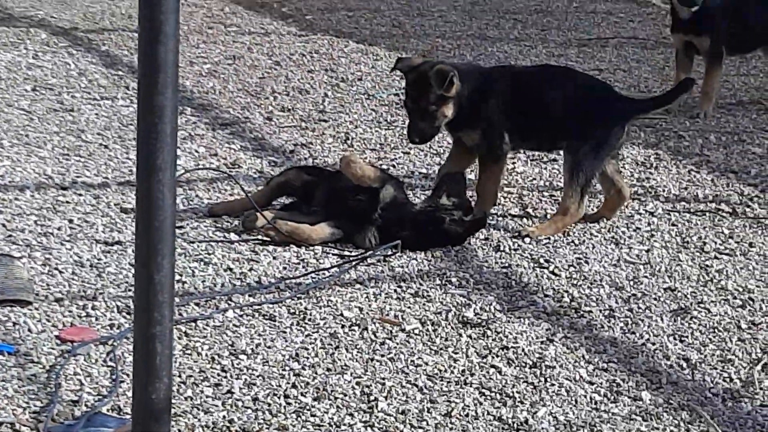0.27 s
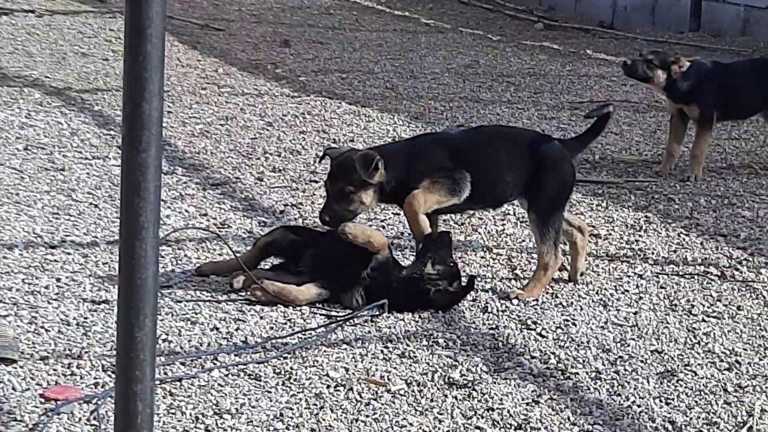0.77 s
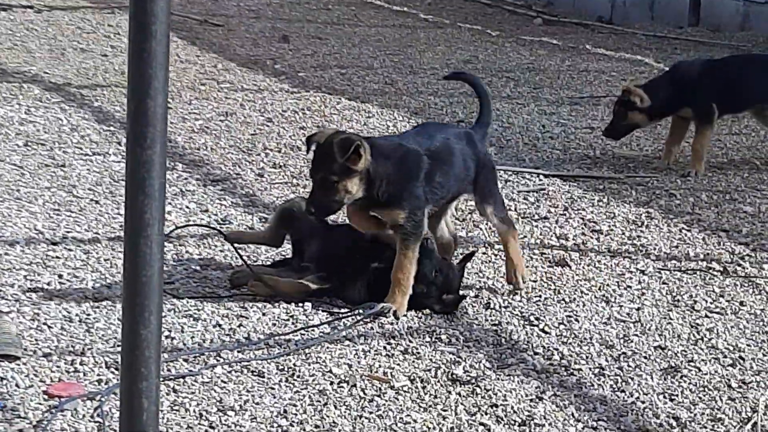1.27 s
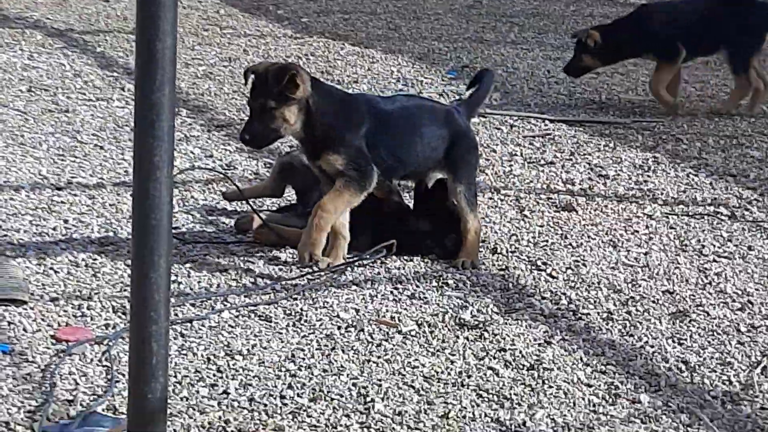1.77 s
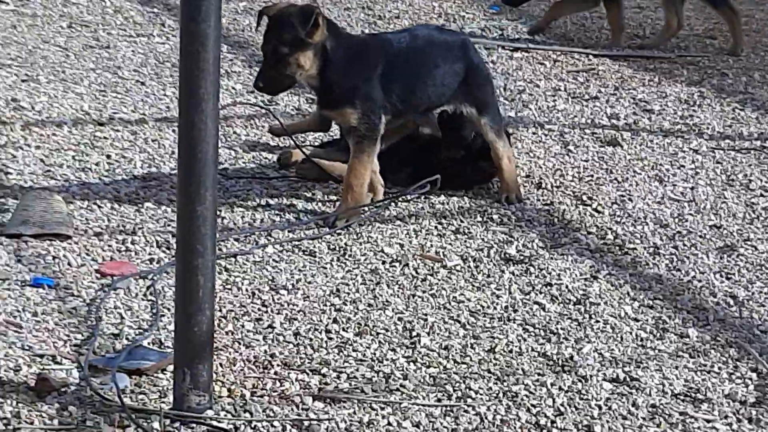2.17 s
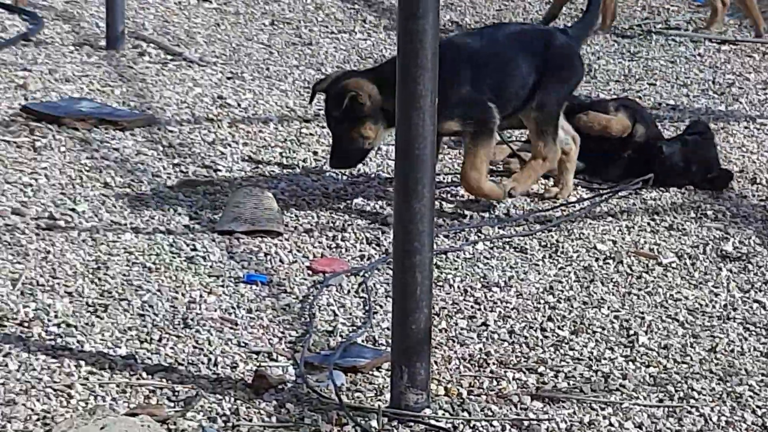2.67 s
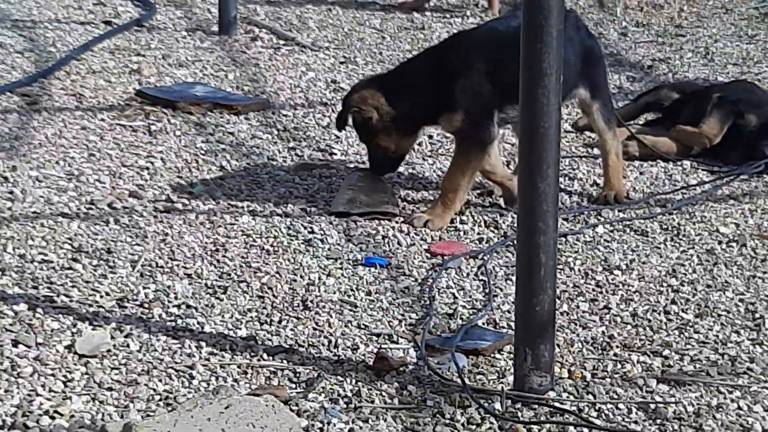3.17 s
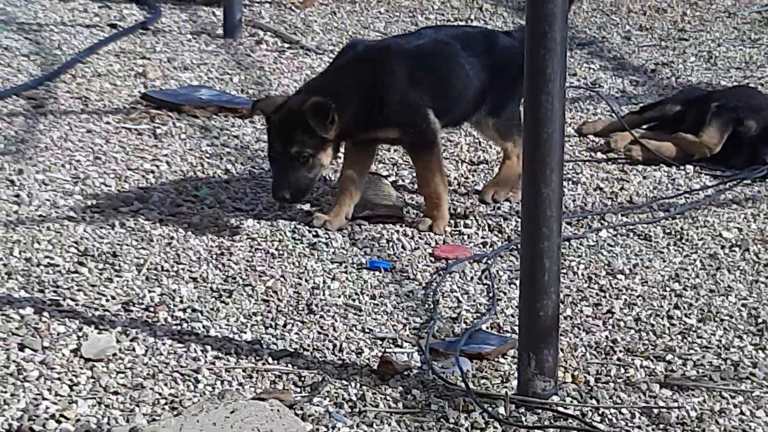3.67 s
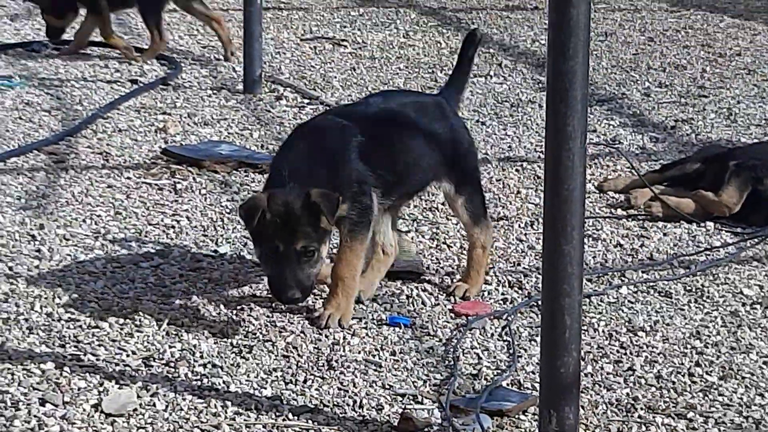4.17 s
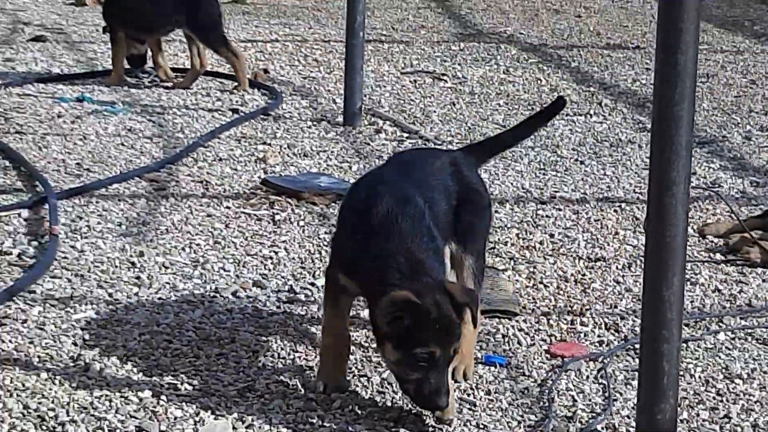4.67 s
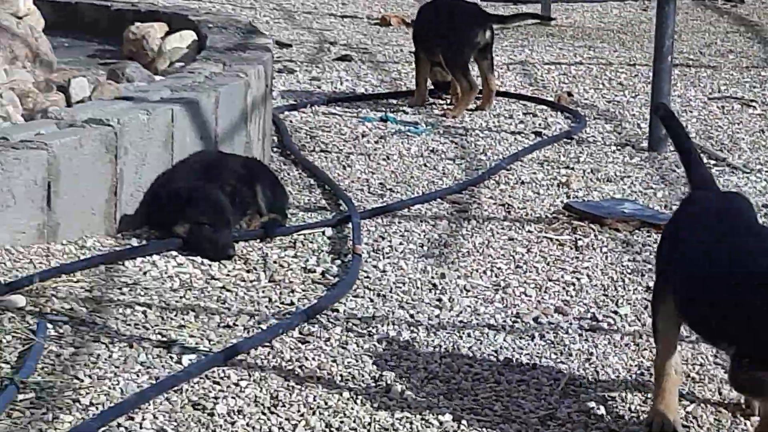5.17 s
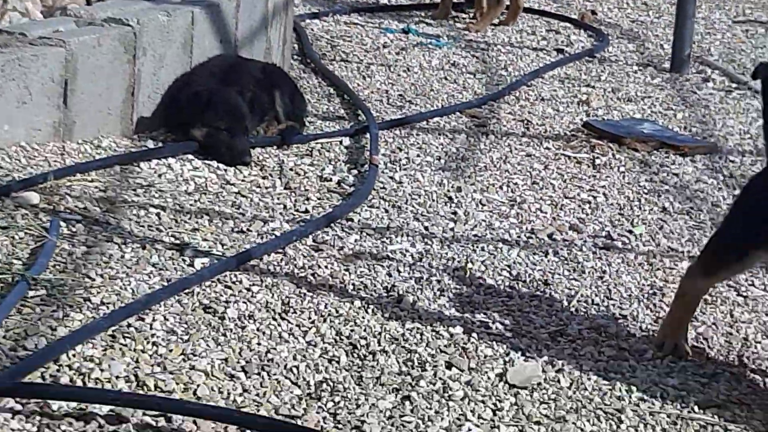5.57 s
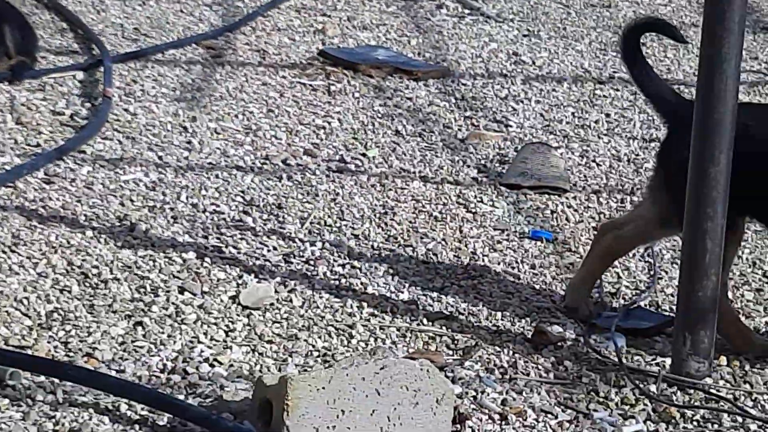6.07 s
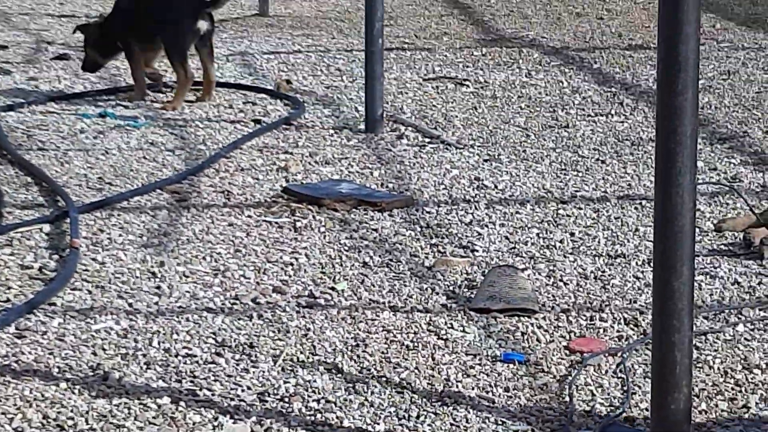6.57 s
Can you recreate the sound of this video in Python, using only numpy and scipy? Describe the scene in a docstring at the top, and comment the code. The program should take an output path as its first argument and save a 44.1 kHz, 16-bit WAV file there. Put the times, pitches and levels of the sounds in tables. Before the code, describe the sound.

Puppies scuffle in a gravel yard, a few metres from a handheld stereo microphone. Their paws softly grind grit, scrape stones and click pebbles together over a faint outdoor hiss. Gusts of wind rumble and thump on the microphone, loudest in the first half. Past the middle one puppy gives a short, low, rough growl, then a few more pebble clicks and light puffs of wind follow.

```python
"""An airy outdoor hiss and shifting gravel come first: puppies scuffle in a yard, a few metres from a
handheld stereo recorder. Their paws grind grit, scrape stones and knock pebbles together, while a gusty
breeze rumbles and thumps on the two microphone ports separately. Past the middle one puppy gives a short
low growl, its unsteady vocal folds breaking between two pitches through throat and mouth."""
import sys
import numpy as np
from scipy import signal
from scipy.fft import rfft, irfft, next_fast_len
from scipy.io import wavfile
from scipy.ndimage import uniform_filter1d

SR = 44100
rng = np.random.default_rng(int(sys.argv[2]) if len(sys.argv) > 2 else 0)


def pcm_store(signal):
    """Save signal as 16-bit PCM."""
    levels = np.round(np.clip(np.atleast_2d(signal), -1, 1) * 32767)
    wavfile.write(sys.argv[1], SR, levels.astype(np.int16).T)


N = 300762
LAG_MS = .36  # most sound reaches the left port first


def undb(db):
    """dB to gain."""
    return 10 ** (np.asarray(db) / 20)


def unit(x):
    """Scale to rms 1."""
    return x / np.sqrt(np.mean(x ** 2))


def curves(table):
    """Columns of a timed table, interpolated sample by sample."""
    times, *columns = np.transpose(table)
    return [np.interp(np.arange(N) / SR, times, column) for column in columns]


def hump(f, hz, width):
    """Gain of a resonance centred on hz."""
    return 1 / (1 + ((f - hz) / (width / 2)) ** 2)


def colour(x, gain):
    """Weight the spectrum of x by gain(Hz)."""
    size = next_fast_len(x.shape[-1])
    f = np.arange(size // 2 + 1) * SR / size + 1
    return irfft(rfft(x, size) * gain(f), size)[..., :x.shape[-1]]


def spectrum(points):
    """Gain function through (f/Hz, level/dB) points."""
    hz, db = np.transpose(points)
    return lambda f: undb(np.interp(np.log(f), np.log(hz), db))


def walk(per_s):
    """Random levels held 1 / per_s seconds and smoothed twice; spread near 1."""
    hold = int(SR / per_s)
    steps = np.repeat(rng.standard_normal(N // hold + 1), hold)
    return 1.51 * uniform_filter1d(uniform_filter1d(steps, hold), hold)[:N]


def add(out, s, x):
    """Mix x in from time s, dropping what falls outside the scene."""
    start = int(s * SR)
    x, start = x[max(-start, 0):], max(start, 0)
    out[start:start + len(x)] += x[:N - start]


def grit(n, per_s, spread_db, bed):
    """Dense one-sample grains of uneven size over a bed of noise."""
    chance, size = rng.random((2, n))
    grains = (chance < per_s / SR) * undb(-spread_db * np.log(size + 1e-9)) * rng.standard_normal(n)
    return unit(grains) + bed * rng.standard_normal(n)


def ports(x, pan_db=0., lag_ms=LAG_MS):
    """One source at both microphone ports, later on the right."""
    lag = np.round(lag_ms * SR / 1000).astype(int)
    late = x[np.maximum(np.arange(N) - lag, 0)]
    return np.array([x * undb(pan_db / 2), late * undb(-pan_db / 2)])


def scattered(make, gain, shared_hz=2310):
    """Sound from all round the microphones: mostly shared in the bass, less so towards the treble."""
    share = lambda f: .17 + .48 * hump(f, 0, 2 * shared_hz)
    common = ports(colour(make(), lambda f: gain(f) * np.sqrt(share(f))))
    separate = colour(np.array([make(), make()]), lambda f: gain(f) * np.sqrt(1 - share(f)))
    return unit(common + separate)


def yard(x, pan_db, lag_ms, scatter_db, t60_s=.05):
    """Direct sound plus the short scatter off ground and walls, which differs at each port."""
    t = np.arange(int(.15 * SR)) / SR
    tails = rng.standard_normal((2, len(t))) * np.exp(-np.log(1000) * t / t60_s) * (t > .001)
    tails = undb(scatter_db) * tails / np.linalg.norm(tails, axis=1, keepdims=True)
    return ports(x, pan_db, lag_ms) + signal.fftconvolve(x[None], tails, axes=1)[:, :N]


# Open air, far off, all round the microphones: f/Hz, relative density/dB
AIR_SPECTRUM = [(35, -56), (60, -9), (100, -8), (206, -9.5), (377, -5.5), (630, -13), (741, -29),
                (1180, -12), (1790, -10.5), (2260, -23.5), (2860, -25.5), (3700, -15.5), (5200, -23.5),
                (7080, -17.5), (9370, -17.5), (12700, -25.5), (15600, -25.5)]
# Its slow swell: t/s, level change/dB
HISS_SWELL = [(0, 5.5), (.3, -1.5), (1.4, -2.5), (2.2, 4.5), (5.3, 1), (6.82, -2)]


def air(level_db=-65):
    """Far hiss that swells slowly."""
    hiss = scattered(lambda: rng.standard_normal(N), spectrum(AIR_SPECTRUM))
    return undb(level_db + curves(HISS_SWELL)[0]) * hiss


# Gravel under paws, a few metres off: t/s, grit level/dB, then relative to it fine/dB, coarse/dB, rumble/dB
GRAVEL_SHIFTS = [(0.0, -63.5, -3, -0.5, -5), (0.32, -74.5, -3, -10.5, 0.5), (0.51, -65.5, -2, -7, -7),
                 (0.89, -76, -10, 0, 6.5), (1.37, -74, -9, 0.5, -2), (1.5, -64, 3.5, -17, -14),
                 (1.58, -59, 2, -19, -17), (1.65, -59, 1.5, -16.5, -17), (1.84, -66.5, -2, 1, 3),
                 (2.1, -64, -1, -1.5, -1), (2.36, -64.5, 4, 0, -3), (2.5, -66, -1.5, 0.5, -4.5),
                 (2.75, -66, -2, -6, -5), (3.1, -62, -1, -1, -4), (3.2, -67, -4.5, 3, 2.5),
                 (4.24, -64, -1, -5.5, -7.5), (4.62, -69, -1.5, -5.5, -5.5), (4.84, -60, -3, 2.5, 0.5),
                 (5.24, -64, -1, -3, -6), (5.6, -73.5, -5, -0.5, -3.5), (5.79, -63.5, -1, -4, -8),
                 (6.11, -69.5, -0.5, -12, -13), (6.17, -63, -4, -7, -17), (6.59, -69, 1, -2, -1),
                 (6.71, -61, -4, -5, -17), (6.82, -74.5, -2, 2.5, -9)]


def gravel():
    """Grit and stones grinding in four size ranges that flicker partly together."""
    db, fine_db, coarse_db, rumble_db = curves(GRAVEL_SHIFTS)
    flicker_db = 1.1 * walk(9) + 1.2 * walk(20)
    grains = lambda: grit(N, per_s=1500, spread_db=2.03, bed=.98)
    sizes = (0, 6500, 5500), (fine_db, 13300, 9000), (coarse_db, 1850, 2200), (rumble_db, 850, 700)
    out = 0
    for size_db, hz, width in sizes:
        band = scattered(grains, lambda f: hump(f, hz, width) ** 2)
        out = out + band * undb(db + size_db + flicker_db + .26 * walk(21.6))
    return out


# Turbulence right at the ports, one list for slow eddies and one for fast: f/Hz, relative density/dB
EDDY_SPECTRA = [
    [(20, -7.5), (65, 11.5), (125, 4.5), (200, -32), (400, -61), (900, -85)],
    [(40, -20), (125, 4.5), (190, -6.5), (300, -7.5), (500, -17), (700, -42.5), (1500, -57.5)],
]
# Breeze on the recorder: t/s, length/s, strength/dB, change to the end/dB, left minus right/dB
PORT_GUSTS = [(0.0, 0.027, -57, 9, 0), (0.539, 0.24, -48.5, -0.5, -0.5), (1.17, 0.1, -54.5, -4, 7),
              (1.533, 0.22, -41, -2.5, 1.5), (1.72, 0.028, -27.5, -6, 1), (1.768, .27, -40.5, -3, -2),
              (2.092, 0.39, -47, 2, 1), (2.727, 0.087, -58, 5, 18), (2.911, 0.35, -44.5, 4.5, 3),
              (3.105, 0.11, -34.5, -5.5, 0), (3.296, 0.16, -47, -3, 1.5), (3.454, 0.23, -43.5, -13, -2),
              (3.746, 1, -76, 6, -1), (4.74, .1, -63, -4.5, -3), (5.03, 0.17, -54, 5, 2),
              (5.394, 0.25, -58.5, 6.5, -0.5), (5.652, 0.19, -51, 2, 0.5), (5.967, 0.56, -72, 1.5, 19),
              (6.611, 0.09, -58, 4, 4.5), (6.738, 0.071, -49, -8, 5.5)]


def gusts(calm_db=-78, rise_db_s=903, fall_db_s=213, shared=.18):
    """Lumpy low turbulence, mostly unrelated at the two ports."""
    t, out = np.arange(N) / SR, np.zeros((2, N))
    veer_db = 3 * walk(14)  # the gust swings from port to port
    common = rng.standard_normal((2, N)) * np.sqrt(shared / (1 - shared))
    for side, port in zip((1, -1), out):
        eddies = []
        for points, common_noise in zip(EDDY_SPECTRA, common):
            rumble = colour(rng.standard_normal(N) + common_noise, spectrum(points))
            eddies.append(unit(rumble * undb(3.57 * walk(45) + 2.5 * walk(18))))
        slow, fast = eddies
        gust_db = calm_db
        for s, length, db, change_db, pan_db in PORT_GUSTS:
            held_db = db + side * pan_db / 2 + change_db * np.clip((t - s) / length, 0, 1)
            edge_db = rise_db_s * np.maximum(s - t, 0) + fall_db_s * np.maximum(t - s - length, 0)
            gust_db = np.maximum(gust_db, held_db - edge_db)
        gust_db += side * veer_db / 2
        # stronger gusts break into faster eddies
        turbulence = slow * undb(-.12 * (gust_db + 55.5)) + fast * undb(.56 * (gust_db + 37.5))
        port += undb(gust_db) * turbulence
    return out


# Paws dragging on the ground, a few metres off: t/s, level/dB, f/Hz, width/Hz, length/ms
PAW_SCRAPES = [(.04, -56, 740, 254, 160), (2.235, -45.5, 940, 870, 60), (2.263, -41, 1350, 428, 19),
               (2.35, -57, 5000, 9050, 195), (2.45, -55.5, 830, 150, 108), (2.796, -48.5, 4730, 9100, 12),
               (2.819, -44, 5800, 9000, 7.5), (2.815, -54.5, 1830, 2600, 47), (2.858, -47, 780, 674, 59),
               (2.909, -47, 820, 696, 13), (3.07, -46.5, 940, 695, 36), (3.085, -52.5, 3500, 7000, 30),
               (4.311, -62, 2390, 2110, 59), (6.45, -68, 860, 300, 210)]


def scrapes():
    """Each scrape is a burst of grains that swells and fades."""
    out, t = np.zeros(N), np.arange(-.15, .15, 1 / SR)
    for s, db, hz, width, ms in PAW_SCRAPES:
        grains = grit(len(t), per_s=2000, spread_db=1.27, bed=1)
        burst = unit(colour(grains, lambda f: hump(f, hz, width) * f / (f + 400)))
        swell = np.exp(-(t / (.00063 * ms)) ** 2)
        add(out, s + t[0], undb(db) * burst * swell)
    return out


# Pebbles struck on the same ground: t/s, crack peak/dB, f/Hz, width over f, snap drive/dB
PEBBLE_KNOCKS = [(0.228, -50, 5850, 0.36, -22), (0.47, -55, 5620, 0.38, -26), (0.568, -59, 11000, .8, -5.5),
                 (1.208, -50, 1740, 1, -27), (1.264, -55, 690, 0.74, -21), (1.83, -36, 1180, 0.44, -38),
                 (1.883, -41, 736, 1, -25), (2.119, -45, 3800, 0.52, -15), (2.127, -41, 3860, 0.29, -29),
                 (2.157, -39.5, 1140, 0.57, -32), (2.186, -53, 826, .9, -13), (2.221, -55, 3960, 0.82, -18),
                 (2.326, -47, 2080, 1, -7.5), (2.399, -39, 845, 0.12, -31), (2.994, -54, 1750, .9, -9),
                 (4.003, -51.5, 748, 0.68, -11), (4.108, -48.5, 3080, 0.17, -32), (4.17, -45, 2340, 1, -17),
                 (4.346, -40, 1320, 0.5, -24), (5.595, -49, 1150, 0.38, -15.5),
                 (5.619, -40, 1390, 0.21, -31), (5.679, -52.5, 2310, .8, -18),
                 (5.965, -54, 6390, 0.45, -20), (6.142, -42, 3730, 0.53, -10.5),
                 (6.143, -44.5, 1830, .9, -24), (6.168, -47, 4400, .8, -24), (6.312, -43, 6450, 0.58, -16)]


def knocks(decay_s=.0018):
    """Pebbles knock with a short coloured crack and a bright snap."""
    out, t = np.zeros(N), np.arange(-500, 3500) / SR
    snap_fade = (t >= 0) * (np.exp(-t / .0016) + .25 * np.exp(-t / .012))
    for s, db, hz, width_ratio, snap_db in PEBBLE_KNOCKS:
        crack_noise, snap_noise = rng.standard_normal((2, len(t))) * (t >= 0)
        crack_noise[t == 0] = 3.2  # first contact
        crack = colour(crack_noise * np.exp(-t / decay_s), lambda f: hump(f, hz, width_ratio * hz))
        snap = colour(snap_noise, lambda f: hump(f, 8500, 14000)) * snap_fade
        add(out, s + t[0], undb(db) * (crack / np.abs(crack).max() + 5.8 * undb(snap_db) * snap))
    return out


# The paws' path across the yard, heard from the recorder: t/s, lag of the right port/ms
PAW_PATH = [(0, .36), (2.0, .38), (2.6, .47), (4.4, .5), (4.7, .3), (6.82, .32)]


def paws():
    """Knocks and scrapes wander across the yard, shifting the delay between the ports."""
    return yard(knocks() + scrapes(), pan_db=.3, lag_ms=curves(PAW_PATH)[0], scatter_db=-9)


# Wind thumps right on the microphones: t/s, left level/dB, right level/dB, f/Hz, length/ms
PORT_BUFFETS = [(0.549, -39, -35, 101, 13), (0.657, -39, -60, 118, 5.3), (0.753, -39, -45, 112, 8.9),
                (1.531, -27.5, -60, 150, 6.3), (1.531, -60, -30, 229, 7.1), (1.59, -58, -48, 102, 35),
                (1.699, -49, -31, 115, 34), (1.727, -10.5, -11.5, 142, 8.1), (1.742, -30, -30, 330, 12),
                (1.762, -47, -60, 115, 6.8), (1.791, -24, -26.5, 118, 13), (1.832, -23.5, -61.5, 113, 6.4),
                (1.873, -22.5, -39, 119, 4.5), (1.942, -68, -26.5, 147, 10.6), (1.968, -33.5, -46, 101, 15),
                (2, -26.5, -60, 122, 16.6), (2.092, -33.5, -64, 102, 14), (2.147, -50, -65, 89, 17),
                (2.202, -39.5, -54, 93, 27), (2.293, -55, -43, 77, 9), (2.32, -42, -60, 121, 16),
                (2.346, -29, -28.5, 134, 10), (2.39, -38, -37, 160, 5.9), (2.415, -26.5, -25.5, 105, 5.6),
                (2.486, -33, -37, 109, 9.5), (2.923, -56, -38, 100, 6.3), (2.985, -71, -34.5, 154, 14),
                (3.01, -42, -20.5, 134, 4.3), (3.039, -45, -60, 117, 10), (3.072, -30, -60, 78.4, 24),
                (3.073, -54, -30.5, 438, 4.4), (3.136, -21, -62, 174, 15), (3.137, -60, -19, 241, 5.6),
                (3.168, -60, -31.5, 250, 11), (3.205, -24.5, -22, 120, 15), (3.237, -58, -60, 97, 15),
                (3.27, -37, -60, 126, 21), (3.334, -35, -32.5, 107, 5.9), (3.39, -39.5, -62, 79, 64),
                (3.482, -24, -21, 88.4, 18), (3.54, -27, -27, 78, 13), (3.577, -36, -35, 93, 11),
                (3.602, -73, -36.5, 80, 15), (5.6, -38, -45, 70, 20), (5.677, -36.5, -60, 95, 28),
                (5.8, -38, -44, 75, 18), (6.693, -36, -44, 110, 8)]


def buffets():
    """Single buffets: brief low wind thumps, with unrelated phase at the two ports."""
    out, t = np.zeros((2, N)), np.arange(-.05, .05, 1 / SR)
    for s, left_db, right_db, hz, ms in PORT_BUFFETS:
        left_turn, offset = rng.random(2)
        right_turn = left_turn + 1.02 * (offset - .5)
        shape = np.exp(-(t / (np.where(t < 0, .0004, .0007) * ms)) ** 2)  # sudden onset, slower release
        for port, db, turn in zip(out, (left_db, right_db), (left_turn, right_turn)):
            swing = 2 * np.pi * (hz * t + turn)
            overtone = .3 * shape ** 2 * np.cos(2.03 * swing)  # from the steep front
            add(port, s + t[0], undb(db) * (shape * np.cos(swing) + overtone))
    return out


# One puppy a few metres off, pitch breaking down and back up: t/s, f/Hz, level/dB, mouth over throat/dB
GROWL_CONTOUR = [(4.57, 102, -65, -30), (4.61, 103.2, -51, -47), (4.66, 94.7, -50.5, -43),
                 (4.71, 107.7, -47, -18), (4.795, 119.4, -47.5, -10), (4.81, 85.55, -43.5, -13.5),
                 (4.9, 82.94, -44, -7), (5.035, 77.8, -48, -10), (5.045, 111.7, -46.5, -8.5),
                 (5.1, 107, -46.5, -8.5), (5.19, 108.7, -45.5, -5.5), (5.24, 101.9, -45.5, -9.5),
                 (5.29, 110.3, -52.5, -2), (5.36, 134.9, -66, 0)]
# Its vocal registers, each from its start: t/s, odd harmonics/dB, roughness 0-1, resonance stretch factor
GROWL_REGISTERS = [(4.57, -4, 0.54, 1.03), (4.8, 0, 0.49, 1.01), (5.04, -1, 0.33, 1.02),
                   (5.079, -3, 0.13, 1.063), (5.22, -9, .06, .99), (5.28, -0.5, .05, 1.1),
                   (5.32, -18, .05, 1.22)]
# Its throat resonances: f/Hz, width/Hz, relative level/dB
THROAT_MODES = [(201, 77, 3.5), (313, 170, -1), (435.6, 113, 3.5), (535, 60, -6.5)]
# Its mouth resonances: f/Hz, width/Hz, relative level/dB
MOUTH_MODES = [(830, 130, -19), (1036, 100, -4), (1242, 250, 4.5), (2080, 200, 7), (2400, 290, 7),
               (3020, 900, 9.5)]


def growl():
    """Harmonics of unsteady folds through throat and mouth; rough stretches wobble and fill with breath."""
    span = slice(int(GROWL_CONTOUR[0][0] * SR), int(GROWL_CONTOUR[-1][0] * SR))
    hz, db, mouth_db = (curve[span] for curve in curves(GROWL_CONTOUR))
    starts, *traits = np.transpose(GROWL_REGISTERS)
    register = np.maximum(np.searchsorted(starts * SR, np.arange(N)[span]) - 1, 0)
    odd_db, rough, stretch = (uniform_filter1d(trait[register], size=1800) for trait in traits)
    jitter = 1 + .045 * rough * walk(90)[span]
    phase = 2 * np.pi * np.cumsum(hz * jitter) / SR
    # alternately strong and weak openings weaken the odd harmonics
    tones = [np.cos(k * phase + k * k) * undb(odd_db * (k % 2)) for k in range(1, 17)]
    breath = rng.standard_normal(len(hz)) * (1 + np.cos(phase)) * (rough + .04)
    out = np.zeros(N)
    for modes, gain, breath_db in ((THROAT_MODES, 1, 13), (MOUTH_MODES, undb(mouth_db), 5.5)):
        tract = lambda f: sum(undb(level) * hump(f, centre, width) ** 2 for centre, width, level in modes)
        clear = sum(tract(k * hz / stretch) * tone for k, tone in enumerate(tones, 1))
        shimmer = undb(8 * rough * walk(70)[span])
        voice = clear * shimmer + undb(breath_db) * colour(breath, tract)
        running_rms = np.sqrt(uniform_filter1d(voice ** 2, size=2600))
        out[span] += gain * voice / running_rms
    out[span] *= undb(db) * signal.windows.tukey(len(hz), .05)
    return yard(out, pan_db=-.3, lag_ms=LAG_MS, scatter_db=-6)


def scene():
    """Near to far: wind on the microphones, puppies a few metres off, distant air."""
    return gusts() + buffets() + growl() + gravel() + paws() + air()


# Treble dip of each microphone port, left then right: f/Hz, width/Hz, level/dB
MIC_DIPS = [(9840, 1100, -9), (8900, 1100, -9)]


def record(dry, top_hz=15740):
    """Handheld stereo recorder: each port has a dip in the treble; the top is cut steeply."""
    dipped = [colour(x, lambda f: undb(db * hump(f, hz, width)))
              for x, (hz, width, db) in zip(dry, MIC_DIPS)]
    return signal.sosfilt(signal.ellip(12, .2, 70, top_hz, fs=SR, output="sos"), dipped)


dry = scene()
out = record(dry)
pcm_store(out)
```